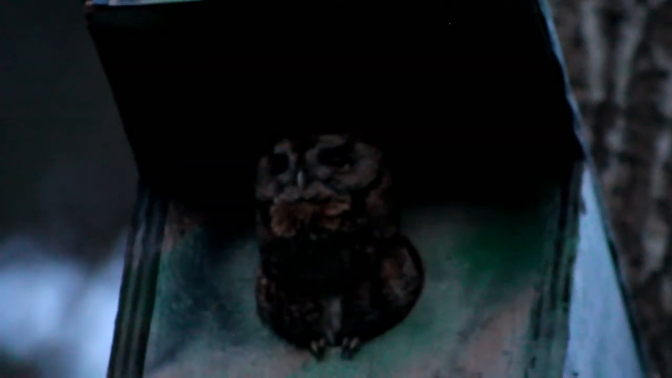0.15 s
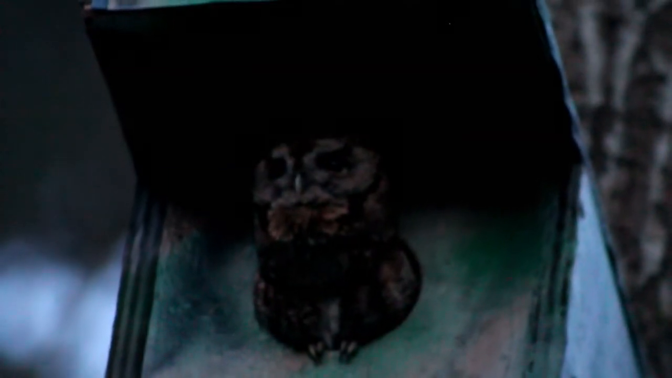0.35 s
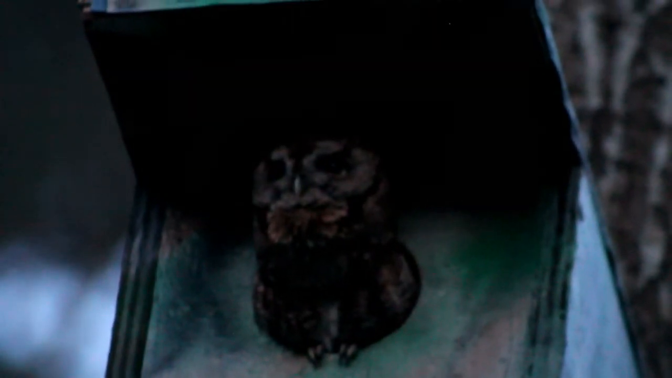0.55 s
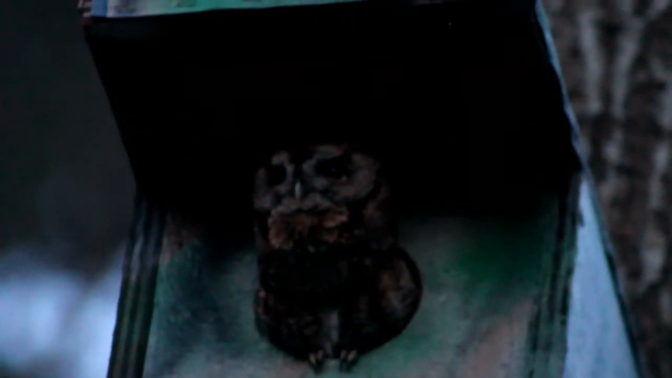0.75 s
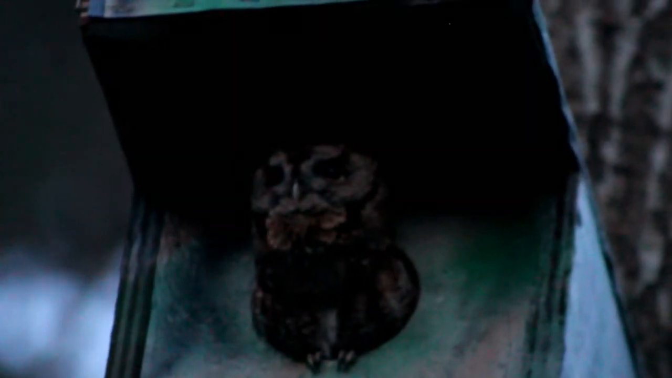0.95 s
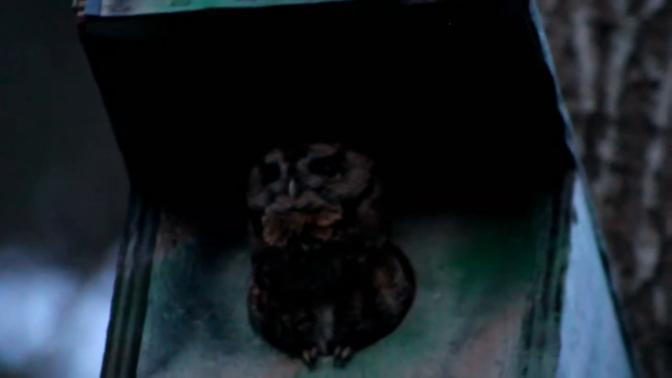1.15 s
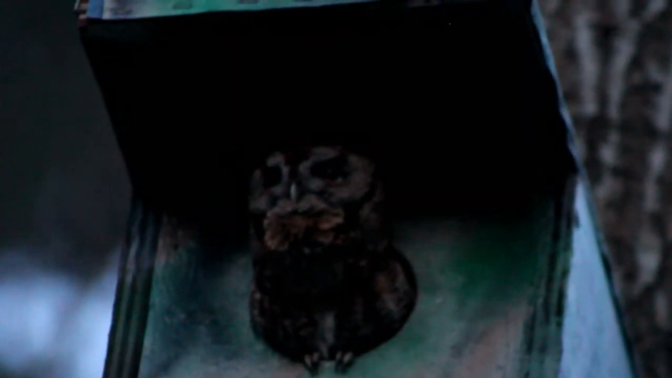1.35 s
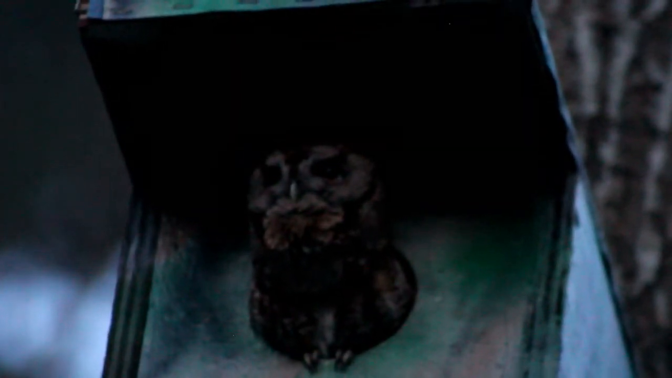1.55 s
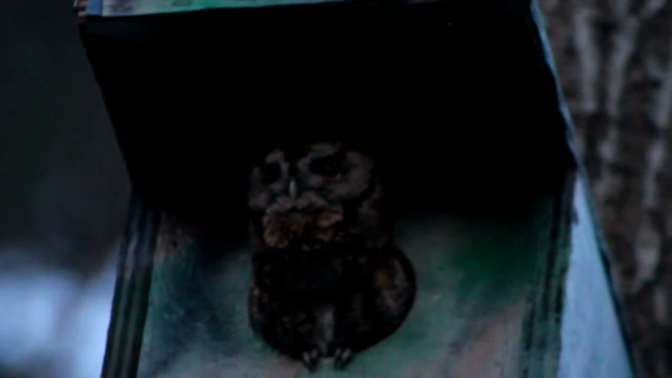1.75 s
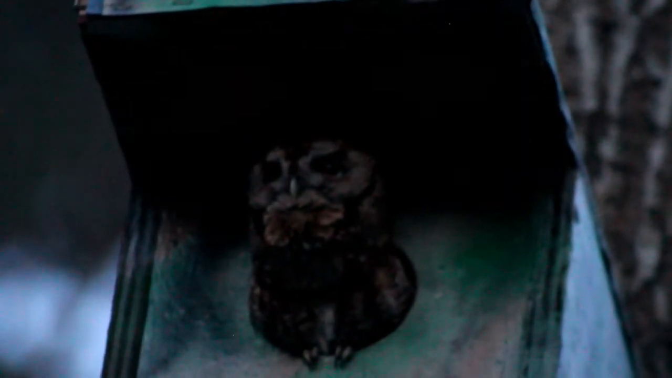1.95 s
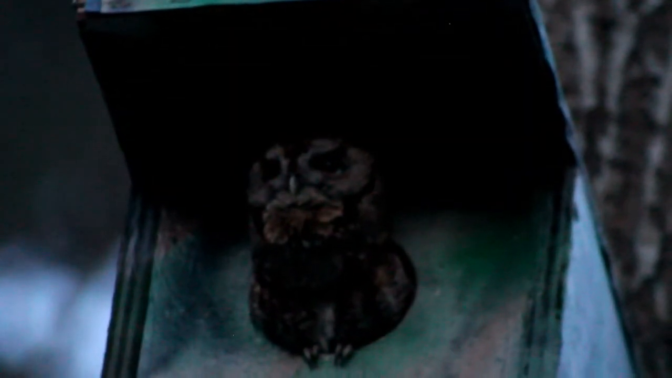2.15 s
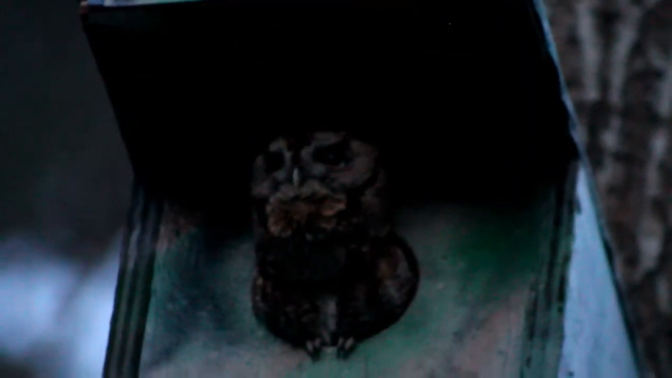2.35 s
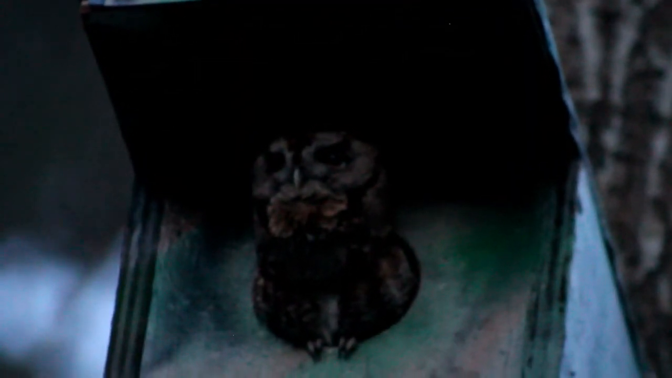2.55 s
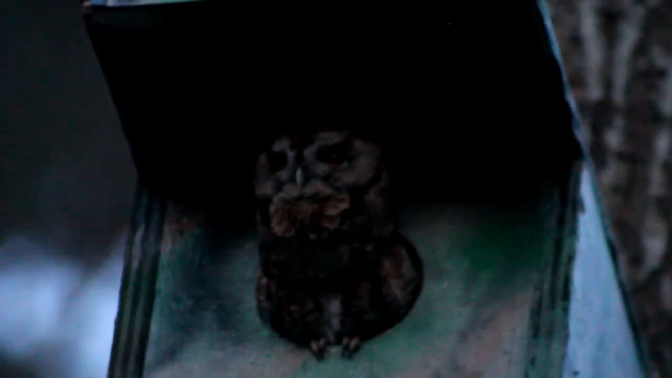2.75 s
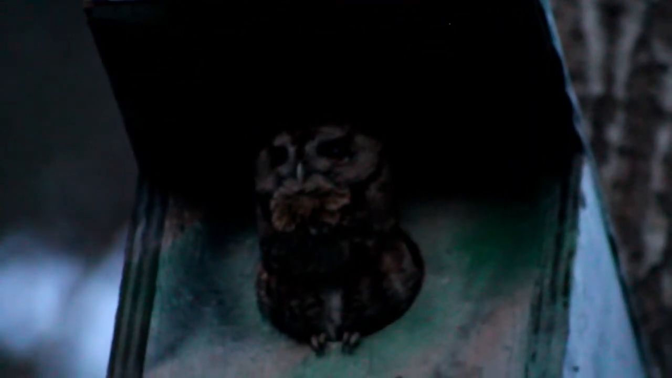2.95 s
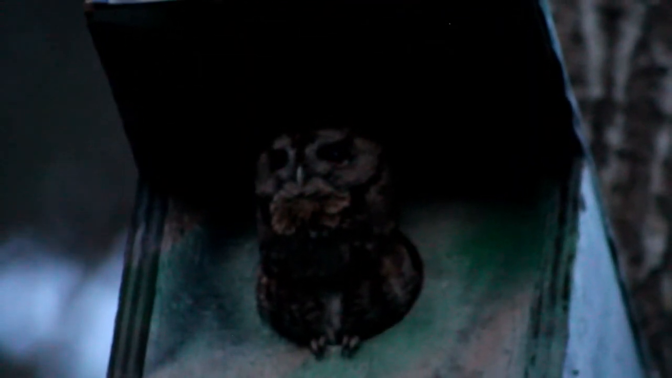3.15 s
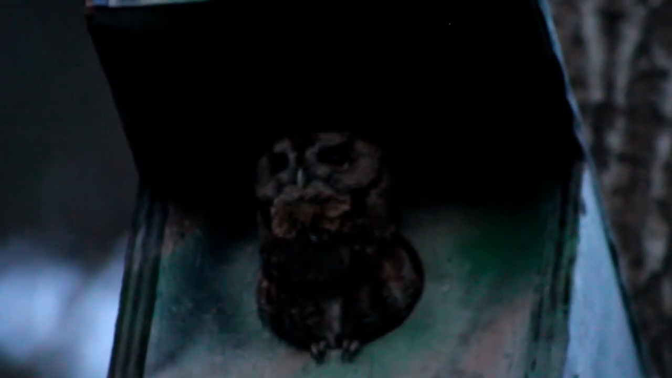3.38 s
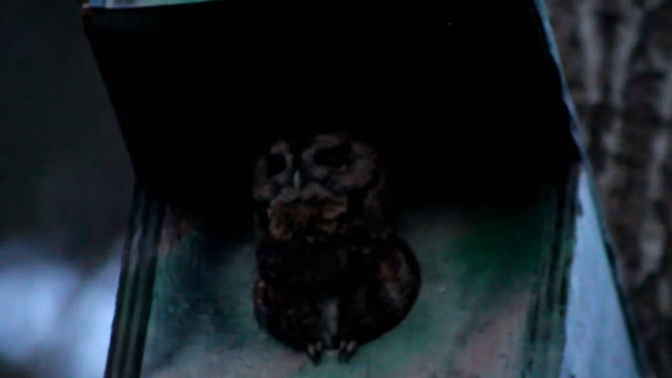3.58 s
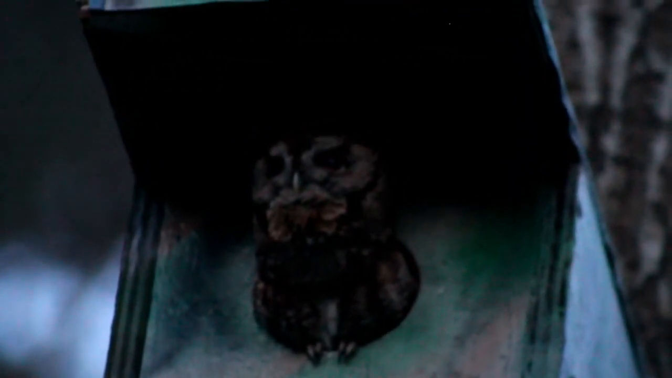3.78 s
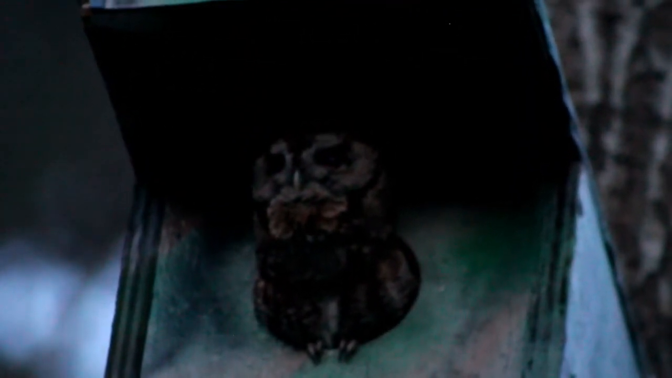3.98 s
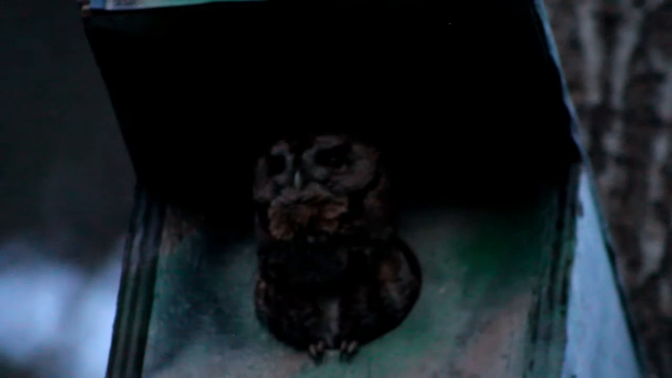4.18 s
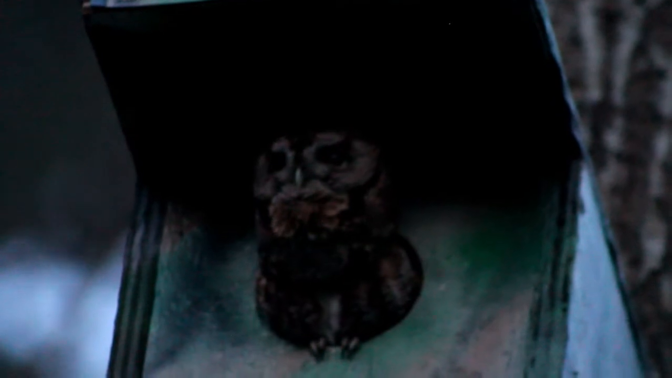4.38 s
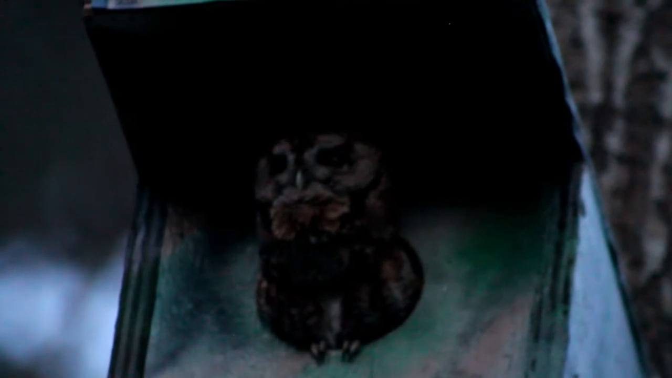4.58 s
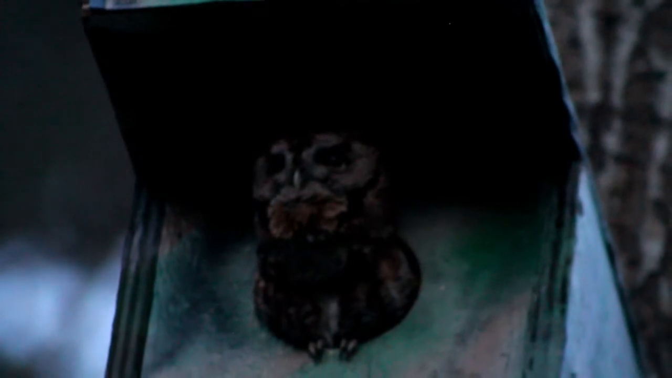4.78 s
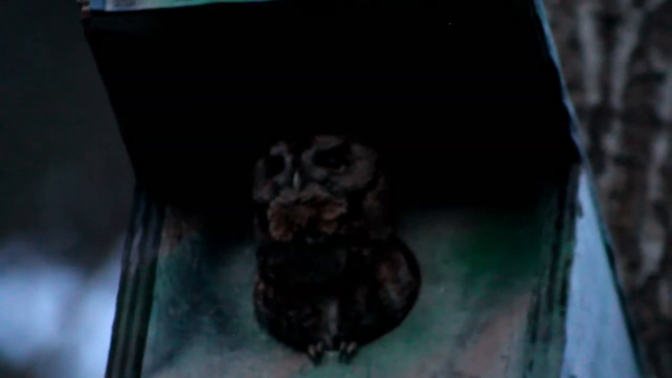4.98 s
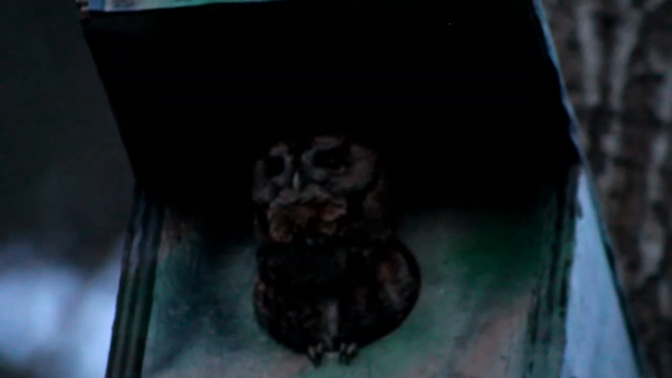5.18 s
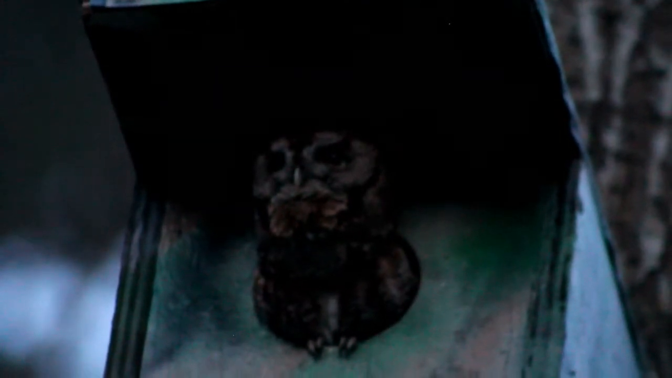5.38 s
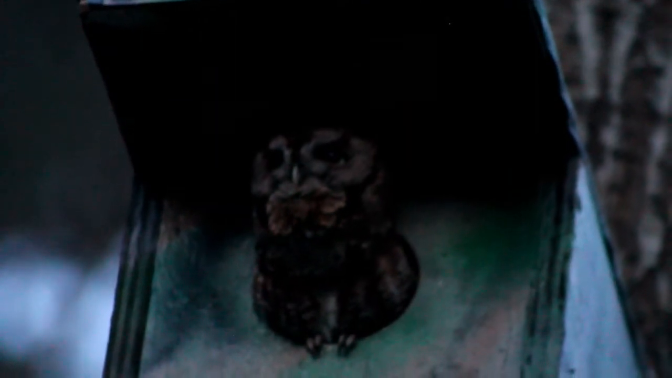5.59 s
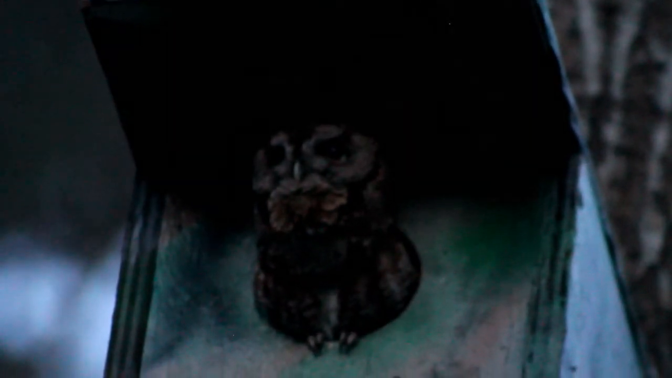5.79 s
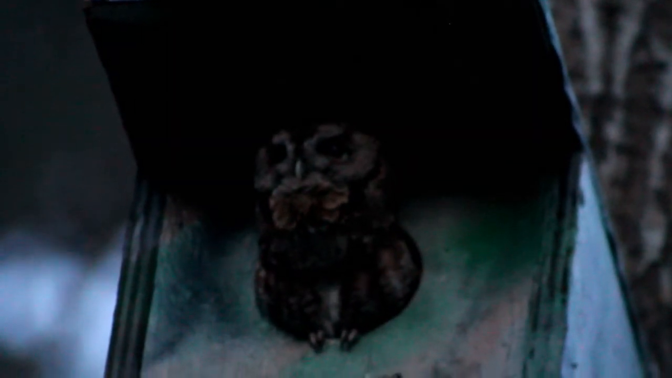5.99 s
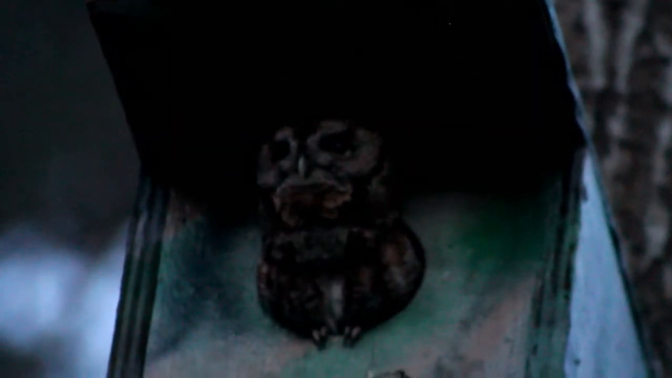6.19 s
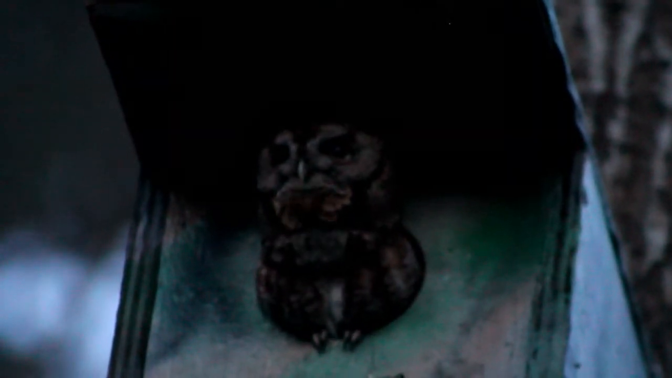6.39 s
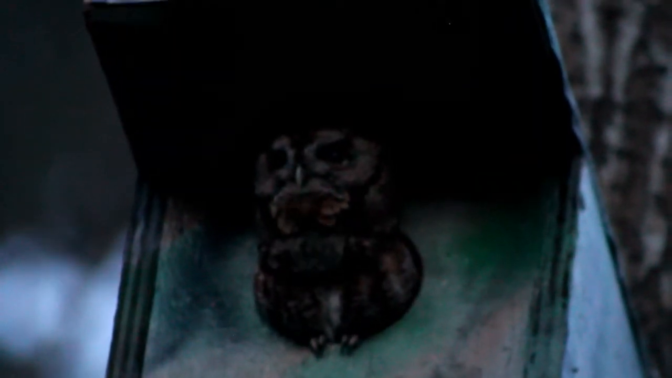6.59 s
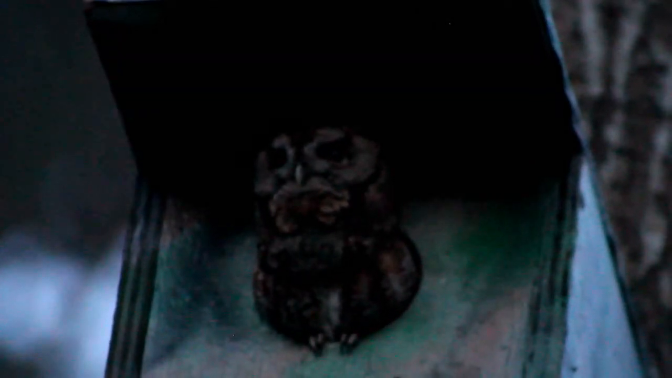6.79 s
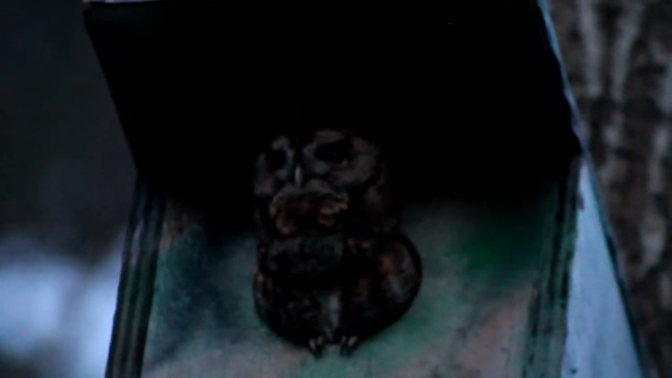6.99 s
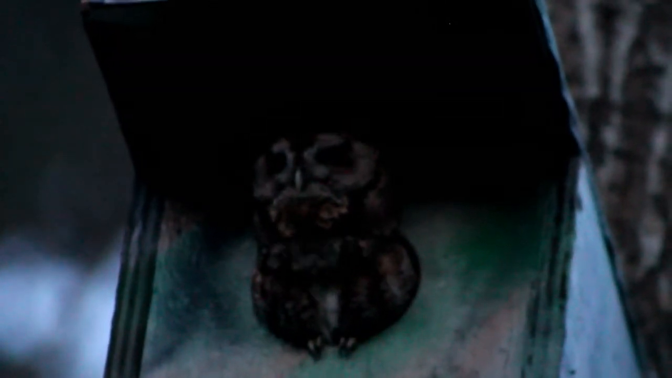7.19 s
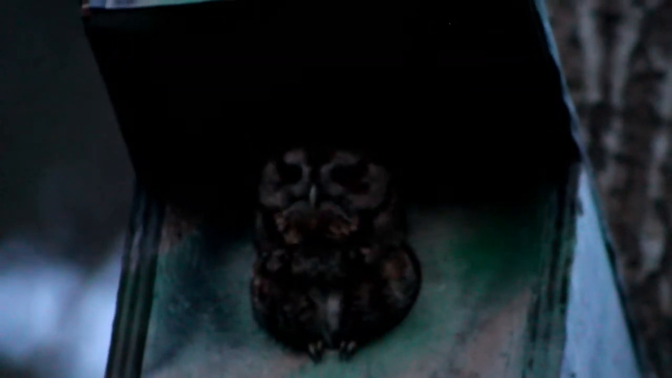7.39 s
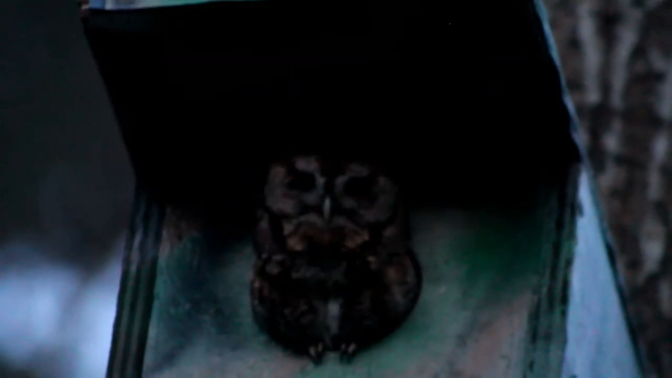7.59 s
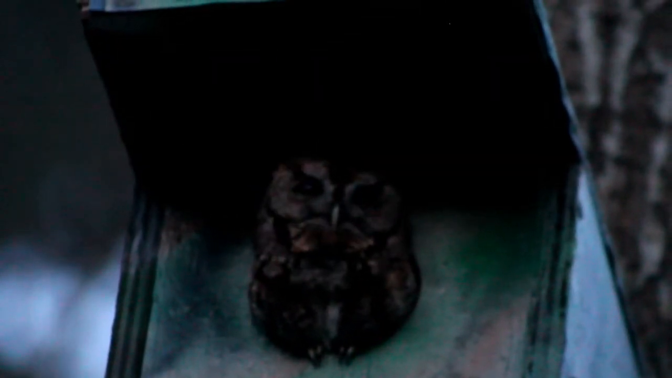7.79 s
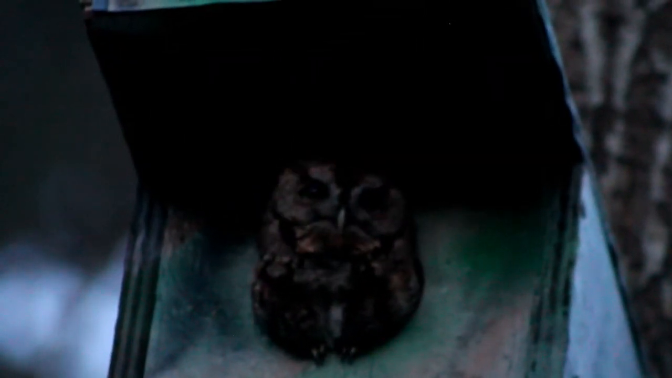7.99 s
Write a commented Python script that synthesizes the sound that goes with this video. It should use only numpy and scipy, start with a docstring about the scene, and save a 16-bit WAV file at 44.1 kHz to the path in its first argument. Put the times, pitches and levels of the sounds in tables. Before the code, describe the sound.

From the start, a small owl gives a long, even trill outdoors: soft, nearly pure whistled notes on one medium pitch, about fourteen a second, with a slight short echo off nearby walls and trunks. It is the main sound, weakens a little near 5.8 seconds and stops just after 6 seconds. Far songbirds give faint, very high, short buzzy chirps throughout, clearest around 0.7, 1.6, 3.4, 6.1 and 7.4 seconds. Underneath lies a quiet, steady wash of distant traffic with very faint hums; one barely audible engine climbs slowly, then drops in pitch as it changes gear around 4 seconds. At about 2.7 seconds something gives the single microphone a brief dull bump. A tiny sharp tick sounds close by near 4.8 seconds, and a lower dry tick at 7.2. Only the faint background remains until the end at about 8 seconds.

```python
"""A small owl at the mouth of a wooden nest box gives a long, even trill at dusk, each soft
whistled note one puff of air, echoing off near walls, fences and trunks.
Far off, songbirds high in the trees sweep a whistle so fast that it buzzes. Distant traffic
washes by over faint hums, one engine climbing and changing gear.
Something bumps the single microphone once, and two dry ticks sound close by."""
import sys
import numpy as np
from scipy import signal
from scipy.fft import rfft, irfft
from scipy.io import wavfile
from scipy.ndimage import uniform_filter1d

SR = 44100
rng = np.random.default_rng(int(sys.argv[2]) if len(sys.argv) > 2 else 0)


def materialize(psi):
    """Save the field psi as 16-bit PCM at rate SR to the path in sys.argv[1].

    A 1-D psi becomes a single channel; in a 2-D psi each row is a channel.
    """
    bounded = np.clip(np.atleast_2d(psi).T, -1, 1)
    quanta = np.round(bounded * 32767).astype(np.int16)
    wavfile.write(sys.argv[1], SR, quanta)


N = 354563


def gain_of(db):
    """Decibels to gain."""
    return 10 ** (np.asarray(db) / 20)


def unit_rms(x):
    """Scales to rms 1."""
    return x / np.sqrt(np.mean(x ** 2) + 1e-20)


def add(mix, s, sound):
    """Mixes a sound in at time s."""
    part = mix[max(round(s * SR), 0):][:len(sound)]
    part += sound[:len(part)]


def step(t, width):
    """A smooth step from 0 to 1 at t = 0."""
    return .5 + .5 * np.tanh(t / width)


def drift(per_s, count):
    """A random wander of rms 1 that changes about per_s times a second."""
    hz = np.fft.rfftfreq(count, 1 / SR)
    return unit_rms(irfft(rfft(rng.standard_normal(count)) / (1 + (hz / per_s) ** 2), count))


def echoes(x, db, first_s, t60_s):
    """The direct sound, then a dying swarm of sparse reflections of random sign."""
    t = np.arange(SR // 2) / SR
    taps = rng.choice([-1., 1.], len(t)) * (rng.random(len(t)) < 2000 / SR)
    taps = taps * np.clip((t - first_s) * 500, 0, 1) * gain_of(-60 * t / t60_s)
    return x + gain_of(db) * signal.oaconvolve(x, taps / np.linalg.norm(taps))[:N]


# Spectrum of the road's wash and hiss at the microphone: f/Hz, relative level/dB
WASH_SPECTRUM = [(20, -20), (38, -19), (55, -9.5), (80, -10), (130, -5.5), (230, -0.5), (330, -4.5),
                 (650, -2.5), (1000, -6), (1600, -10.5), (4500, -17), (9000, -24.5), (13000, -34),
                 (15400, -40.5)]
# Swell of the tyre roar: t/s, boost/dB
TYRE_SWELL = [(0, 2.5), (2, 2), (4, 2), (6, 3), (7, 2), (8.04, 2.5)]

def traffic_wash(bed_db=-64, roar_hz=690, roar_octaves=1):
    """The distant road: a steady bed of noise whose band of tyre roar swells, slightly patchy."""
    frames, hz = N // 512 + 5, np.fft.rfftfreq(2048, 1 / SR)
    real, imag, patches = rng.standard_normal((frames, 1025, 3)).T
    patches = uniform_filter1d(patches, size=16, axis=0)  # smooth across frequency
    patches = unit_rms(uniform_filter1d(patches, size=6, axis=1))  # and across time
    knot_hz, knot_db = np.transpose(WASH_SPECTRUM)
    colour = gain_of(np.interp(np.log(hz + 1), np.log(knot_hz + 1), knot_db))
    bed = (real + 1j * imag) * colour[:, None]
    bed_rms = np.sqrt(np.mean(signal.istft(bed, nperseg=2048, noverlap=1536)[1] ** 2))
    roar_band = np.exp(-(np.log2((hz[:, None] + 1) / roar_hz) / roar_octaves) ** 2)
    swell_db = np.interp(np.arange(frames) * 512 / SR, *np.transpose(TYRE_SWELL))
    wash = bed * gain_of(roar_band * (swell_db + 0.58 * patches))
    return gain_of(bed_db) / bed_rms * signal.istft(wash, nperseg=2048, noverlap=1536)[1][:N]


# An engine on the distant road, climbing, then changing gear: t/s, f/Hz, level/dB
CLIMBING_ENGINE = [(0, 88.4, -77.5), (.92, 92.5, -77), (1.05, 92.6, -86), (1.14, 93.3, -72),
                   (2.75, 97.1, -82), (3.26, 99, -75.5), (3.8, 99.8, -76), (4.33, 82.2, -81.5),
                   (5.05, 80.1, -83), (6.5, 79.8, -85), (8.04, 79, -99)]
# A fainter one farther down the road: t/s, f/Hz, level/dB
FARTHER_ENGINE = [(0, 120.7, -87), (2.3, 121.2, -83.5), (3.8, 125, -81.5), (5, 125.6, -83.5),
                  (5.8, 121.2, -83.5), (6.7, 116.6, -82.5), (7.2, 119.2, -90), (8.04, 120.7, -86)]

def engines():
    """Two engines' firing tones, fading in and out over the distance."""
    t, out = np.arange(N) / SR, np.zeros(N)
    for rows, fading_db in ((CLIMBING_ENGINE, 2.2), (FARTHER_ENGINE, 4)):
        s, hz, db = np.transpose(rows)
        level = np.sqrt(2) * gain_of(np.interp(t, s, db) + fading_db * drift(3, N))
        out += level * np.sin(2 * np.pi * np.cumsum(np.interp(t, s, hz)) / SR)
    return out


# Faint tones in the background: f/Hz, width/Hz, level/dB
HUM_TONES = [(50, 3, -87), (1066, 3, -85), (10015, 3, -104)]

def hums():
    """Bands of noise so narrow that each is heard as a wavering tone."""
    t, out = np.arange(N) / SR, np.zeros(N)
    for hz, width, db in HUM_TONES:
        phase = 2 * np.pi * hz * t
        out += gain_of(db) * (drift(width, N) * np.cos(phase) + drift(width, N) * np.sin(phase))
    return out


# Buzzy calls from far treetops: t/s, length/s, level/dB, lowest f/Hz, highest f/Hz
SONGBIRD_CALLS = [(.003, 0.075, -72, 6000, 7950), (0.128, .06, -78, 6700, 7800),
                  (0.68, 0.091, -68, 5770, 7760), (1.567, 0.1, -69.5, 5910, 7840),
                  (2.19, 0.052, -77, 6600, 7800), (3.38, 0.16, -75, 6070, 7900),
                  (4.985, 0.13, -75.5, 5700, 7920), (5.152, 0.056, -75.5, 6570, 7200),
                  (6.121, 0.1, -70.5, 6190, 7730), (7.356, 0.1, -68.5, 5930, 7900),
                  (7.71, .05, -78.5, 7640, 8600), (7.885, .07, -79, 6600, 7400)]

def songbirds(sweeps_per_s=113):
    """Whistles swept up and down so fast that they buzz, scattered by the trees on the way."""
    out = np.zeros(N)
    for s, length, db, low_hz, high_hz in SONGBIRD_CALLS:
        progress = np.arange(0, length, 1 / SR) / length
        sweeps = np.cumsum(sweeps_per_s * (1 + .25 * drift(40.7, len(progress)))) / SR
        depth = abs(2 * (sweeps % 1) - 1) ** 1.1  # 0 at the top of a sweep, 1 at the bottom
        span_hz = high_hz - low_hz
        hz = high_hz - span_hz * (1 - .35 * progress) * depth  # the low end rises
        hz -= .1 * span_hz * np.exp(-progress / 0.147)  # the call slides up at its start
        shape = np.minimum(progress / 0.047, 1) * np.minimum((1 - progress) / .15, 1)
        shape *= gain_of(-(8 + 5 * depth) * progress)  # the call fades, its low turns first
        add(out, s, gain_of(db) * shape * np.sin(2 * np.pi * np.cumsum(hz) / SR))
    return echoes(out, db=6.5, first_s=0.00072, t60_s=0.66)


# Jolts of the owl's membrane, a flick before the note and an overshoot as it catches:
# t/s before the note's top, width/s, airflow/0-1
MEMBRANE_JOLTS = [(.0218, .0012, .17), (.016, .0015, .09)]

def owl_note(hz, ebb_s, bend, rise_s=.02, sag_hz_per_s=1250, octave_db=-32.5):
    """One puff of air makes a near-pure, sagging whistle; returns the time to its top and the note."""
    lead_s = MEMBRANE_JOLTS[0][0] + 2 * MEMBRANE_JOLTS[0][1]
    t = np.arange(-lead_s, ebb_s, 1 / SR)  # the airflow tops at t = 0
    from_top = np.clip(np.where(t < 0, -t / rise_s, t / ebb_s), 0, 1)
    flow = abs(np.cos(np.pi / 2 * from_top)) ** np.where(t < 0, 1.24, 1.81)
    flow += sum(size * np.exp(-((t + s) / width) ** 2) for s, width, size in MEMBRANE_JOLTS)
    started, settled = step(t + rise_s, .0004), step(t + rise_s - .0045, .001)
    # flat in the flick, sharp as the note starts, then settled
    shift_hz = -50 * (1 - started) + 70 * (started - settled) - sag_hz_per_s * t
    phase = 2 * np.pi * np.cumsum(hz + shift_hz * bend) / SR
    return lead_s, flow * np.sin(phase) + gain_of(octave_db) * flow ** 2 * np.sin(2 * phase)


# Pace of the trill, notes evenly spaced between these marks: note number, t/s of its middle
TRILL_PACE = [(0, .039), (15, 1.1418), (27, 2.018), (38, 2.8177), (42, 3.1111), (53, 3.9142), (55, 4.0588),
              (62, 4.5687), (70, 5.1472), (78, 5.7319), (82, 6.0304)]
# Course of the trill as it reaches the microphone: t/s, level/dB, f/Hz, ebb of the airflow/s
TRILL_COURSE = [(0, -39, 791, 0.023), (.5, -37.5, 797, 0.022), (1.2, -38, 791.6, 0.025),
                (1.9, -36.5, 792.7, 0.022), (2.6, -38.5, 788.5, 0.027), (3.1, -36.5, 792, 0.022),
                (4, -37.5, 789, .024), (4.6, -37.5, 789, 0.023), (4.9, -37.3, 788.5, 0.022),
                (5.55, -38, 788, 0.024), (5.8, -40.4, 792, .026), (6.05, -41.6, 799, 0.026)]
# Notes that stand out as strong or weak: note number, push/dB
TRILL_ACCENTS = [(4, -.9), (10, -1), (16, -1.5), (17, 1), (18, -.8), (21, -1), (42, .7), (45, -1.2),
                 (50, -.8), (65, 1.5), (66, .9), (69, -.9), (70, -.8), (71, .8), (75, -1.2), (76, 1.2)]
# Clear echoes off the near walls: delay/s, relative level/dB
WALL_ECHOES = [(.02152, -23), (.02802, -27.5)]

def owl_trill(push_spread_db=0.38, hz_per_push_db=2.5):
    """The owl at its nest box, heard across the yard; a note pushed harder is louder and sharper."""
    direct, accents = np.zeros(N), dict(TRILL_ACCENTS)
    numbers, mark_s = np.transpose(TRILL_PACE)
    course_s, *course = np.transpose(TRILL_COURSE)
    middles = np.interp(np.arange(numbers[-1] + 1), numbers, mark_s)
    for k, s in enumerate(middles):
        push, stretch, wobble = rng.standard_normal(3)
        db, hz, ebb_s = (np.interp(s, course_s, column) for column in course)
        push_db = accents.get(k, push_spread_db * push)
        hz += hz_per_push_db * push_db
        lead_s, note = owl_note(hz, ebb_s * (1 + 0.046 * stretch), bend=1 + 0.05 * wobble)
        add(direct, s + .0005 - lead_s, gain_of(db + push_db) * note)  # tops just after its middle
    heard = echoes(direct, db=-25, first_s=0.036, t60_s=0.22)  # fences and trunks
    for delay_s, db in WALL_ECHOES:
        add(heard, delay_s, gain_of(db) * direct)
    return heard


# Four rings of one bump on the microphone, then two ticks close by: t/s, level/dB, f/Hz, t60/s
KNOCK_RINGS = [(2.6690, -34, 189, 0.024), (2.6700, -46.5, 158, 0.052), (2.6714, -40, 316, 0.013),
               (2.6678, -49.5, 600, 0.033), (4.7517, -55, 10000, .003), (7.229, -46.5, 1024, 0.014)]

def bump_and_ticks():
    """Small knocks set off heavily damped rings, each rising over one cycle."""
    out, t = np.zeros(N), np.arange(SR // 10) / SR
    for s, db, hz, t60 in KNOCK_RINGS:
        envelope = gain_of(db - 60 * t / t60) * np.minimum(t * hz, 1)
        add(out, s, envelope * np.sin(2 * np.pi * hz * t))
    return out


def scene():
    """The yard at dusk from one microphone position, in mono."""
    return (owl_trill() + songbirds() + traffic_wash() + engines() + hums() + bump_and_ticks())[None]


def record(dry):
    """The microphone's signal, cut off steeply above 15.6 kHz."""
    lowpass = signal.firwin(511, 15600, window=("kaiser", 9), fs=SR)
    return signal.oaconvolve(dry, lowpass[None], "same")


dry = scene()
out = record(dry)
materialize(out)
```